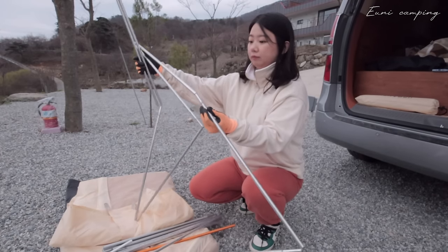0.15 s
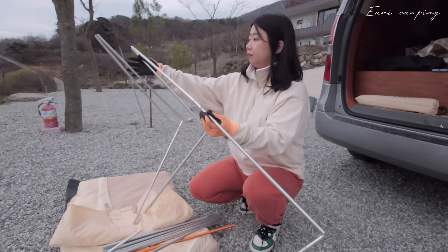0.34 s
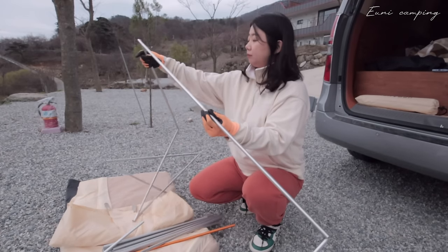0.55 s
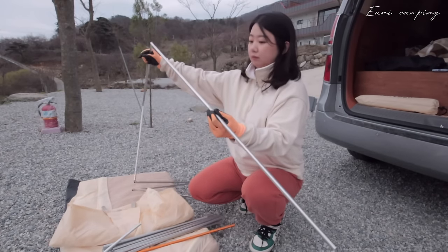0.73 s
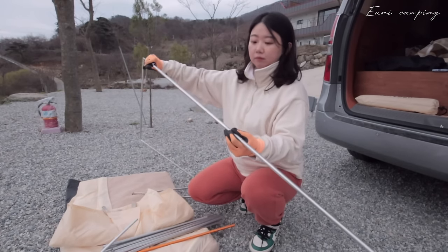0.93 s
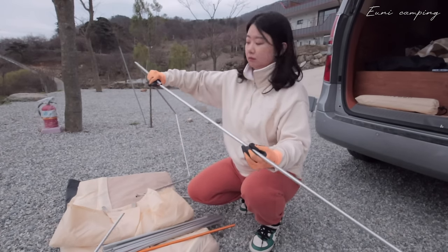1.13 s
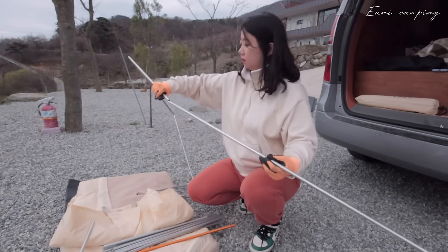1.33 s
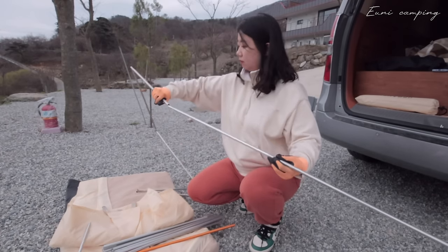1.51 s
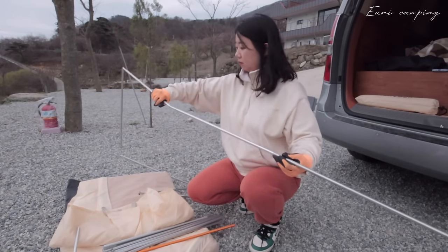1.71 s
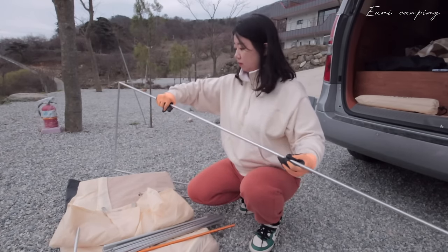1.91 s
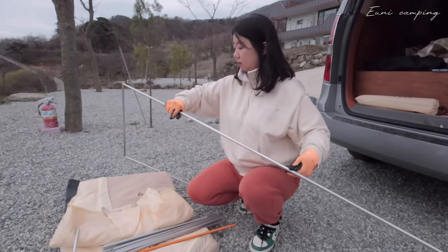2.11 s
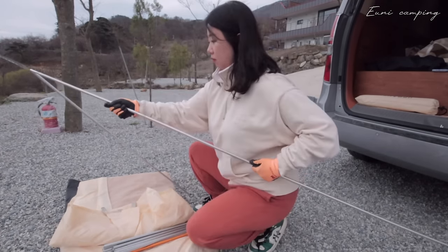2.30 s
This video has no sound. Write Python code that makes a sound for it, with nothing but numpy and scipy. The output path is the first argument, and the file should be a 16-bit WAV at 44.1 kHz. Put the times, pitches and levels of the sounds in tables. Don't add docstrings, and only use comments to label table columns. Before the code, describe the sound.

Metal tent pole tubes clink quickly and slide against each other, hit hardest in the first second, then fade to light ticks and a few crisp joining snaps, outdoors, close up, over faint air hiss.

```python
import sys
import numpy as np
from scipy import signal
from scipy.fft import rfft, irfft
from scipy.io import wavfile

SR = 44100
rng = np.random.default_rng(int(sys.argv[2]) if len(sys.argv) > 2 else 0)


def decibels_to_gain(level_db):
    exponent = np.asarray(level_db, float) / 20
    return 10 ** exponent


def persist_wave(psi):
    counts = np.round(np.clip(psi, -1, 1) * 32767).astype(np.int16)
    wavfile.write(sys.argv[1], SR, np.atleast_2d(counts).T)


N = 103635

# (pitch [Hz], level per Hz [dB])
AIR_COLOUR = [(15, -36), (25, -6), (229, -3), (451, -7.5), (714, -8.5), (935, -5.5), (1690, -9),
              (2680, -8.5), (16000, -22.5)]
# (pitch [Hz], likeness [0 to 1])
AIR_LIKENESS = [(60, 0.99), (240, 0.43), (950, 0.67), (3770, 0.42), (15000, 0.1)]
# (time [s], left over right [dB])
POLE_PLACE = [(0, 2.5), (.45, 1), (1.1, 4.5), (1.75, 0.6), (1.95, 3.5), (2.2, -4.5), (2.35, 0)]
# (pitch [Hz], level [dB])
METAL_COLOUR = [(150, 10.5), (800, 4), (2000, 2), (4000, -1), (7500, 1.5), (9500, -1), (12000, -4),
                (16000, -10)]
# (pitch [Hz], level [dB], halved in use, ring length [s] -
TUBE_TONES = [(1184, -6, 0.35), (2240, -7, 0.078), (3930, -1, 0.13), (5540, -18, 0.24), (5500, -31, 0.13),
              (5670, -1, 0.083), (6120, -14, 0.08), (7550, -2, 0.1), (8100, -26, 0.052)]
# (start [s], length [s], level [dB], from [Hz], to [Hz])
WHISTLES = [
    (0.07, 0.035, -52, 1480, 1180),
    (0.115, 0.055, -62, 1630, 1800),
    (0.918, 0.078, -54.5, 5450, 5830),
    (1.007, 0.075, -44, 5480, 5900),
    (1.009, 0.076, -50, 8040, 9900),
    (1.075, 0.08, -61, 7200, 7400),
    (1.452, 0.096, -67, 5540, 5500),
    (2.198, 0.062, -54.5, 4360, 4250),
    (2.199, 0.046, -57.5, 6840, 6780),
    (2.287, 0.028, -53, 3930, 3930),
]
# (time [s], level [dB])
DRAG = [(0, -61), (.05, -52), (.085, -39.5), (.12, -46.5), (.2, -43.5), (.3, -44.5), (.37, -35.5),
        (.385, -39.5), (.44, -41.5), (.53, -51), (.59, -55), (.76, -48.5), (.82, -44), (.9, -43.5),
        (.99, -55), (1.07, -51), (1.11, -51.5), (1.22, -69)]
# (start [s], length [s], level [dB], brightest [octaves over 1 kHz])
SLIDES = [(0.436, 0.029, -35, 1.9), (.603, 0.023, -44, -0.2), (0.665, 0.02, -29, 2.0),
          (0.469, .05, -41, 2.4), (0.644, 0.024, -48, 0), (1.27, 0.051, -62, 2.5),
          (1.461, 0.018, -65.5, 0.1), (1.489, .04, -51, 5), (1.573, 0.051, -58, 2.5),
          (1.644, 0.062, -60, 3), (1.715, .01, -36, 1.8), (1.727, 0.048, -54.5, 2), (1.87, 0.034, -48.5, 2),
          (1.898, 0.021, -51.5, 1.74), (1.962, 0.022, -50, 2.0), (1.981, 0.045, -52.5, 1.04),
          (2.209, .06, -51, 2), (2.281, 0.027, -48, 1.5), (2.307, 0.056, -57.5, 1.5),
          (0.221, .15, -74, -2.7), (.07, 0.048, -61, 0)]
# (time [s], peak level [dB], brightest [octaves over 1
# kHz], time to fall 60 dB [s])
KNOCKS = [
    (.6135, -23, -0.06, 0.017),
    (.667, -19, -0.6, 0.04),
    (.683, -21, -0.17, 0.057),
    (.697, -19, .7, 0.06),
    (.452, -35, -0.5, 0.04),
    (1.99, -35, -0.14, 0.075),
    (1.211, -49.5, 1.03, 0.016),
    (1.287, -47, 0.44, .03),
    (2.2845, -18, 1.28, 0.041),
    (.777, -44, -.3, 0.04),
          (.6125, -36, -2, .05), (.6675, -26, -2.4, .08), (.672, -22, .1, .05), (.345, -53, -2.6, .08),
         (.444, -32, .4, .07), (1.755, -60, -2.4, .1), (1.99, -36, .26, .06), (.4995, -22, .55, .07),
         (.458, -32, -.6, .05), (.70, -33, -2.4, .08), (2.286, -33, -.2, .05), (1.724, -44, -.3, .07)]
# (time [s],
# peak level [dB], brightest [octaves over 1 kHz], time to fall 60 dB [s])
TOUCHES = [(.0905, -24.5, 2.7, 0.072), (.2122, -19, 2.42, 0.021), (.2178, -27, 2.56, .04),
           (.231, -20, 1.78, 0.08), (.270, -20, 2.26, 0.028), (.2765, -21.5, 2.67, 0.041),
           (.2845, -15.5, 2.4, .012), (.318, -23.5, 1.96, 0.049), (.3425, -18.5, 1.68, 0.12),
           (.348, -14, 2.6, 0.034), (.390, -18, 2.21, .04), (.4252, -14, 2.9, 0.015), (.456, -22, 1.2, 0.02),
           (.4838, -13, 2.7, 0.027), (.4986, 1, 2.5, 0.0098), (.676, -11.5, 0.76, .03),
           (.6962, -1, 2.0, 0.05), (.7742, -17, 3.1, 0.068), (.7765, -8, 1.75, 0.066), (.812, -28, 3.3, .05),
           (.834, -23, 2.9, 0.055), (.870, -21.5, 2.9, 0.078), (.8865, -17.5, 2.64, 0.086),
           (.928, -29.5, 3.2, 0.015), (1.016, -27, 2.4, 0.054), (1.0565, -22, 2.42, 0.13),
           (1.080, -28.5, 2.1, 0.058), (1.117, -36, 2.5, 0.055), (1.137, -32.5, 2.82, 0.098),
           (1.17, -44, 4, .03),
    (1.215, -45.5, 2.24, .03),
    (1.3205, -47, 1.37, 0.021),
    (1.4442, -14.5, 2.015, 0.067),
    (1.453, -17.5, 3.45, 0.064),
    (1.648, -32.5, 2.44, 0.072),
    (1.7225, -13.5, 1.68, 0.047),
    (1.9857, -5, 2.71, 0.023),
    (1.986, -11, 1.25, 0.06),
    (2.011, -27.5, 2.6, 0.081),
           (.0773, -33, 2.3, .04), (.352, -21.5, 1.8, .05), (.362, -24.5, 2.7, 0.045),
         (.4275, -11, 2.35, 0.025), (.4445, -25, 1.5, 0.034), (.4615, -27, .6, .03), (.479, -28, .6, .03),
         (.4853, -11, 2.4, .015), (.5001, -6, 2, 0.027), (.5018, -6, 2.1, .03), (.6135, -30, 1.5, .06),
         (.6668, -18.5, 2.15, 0.025), (.689, -25, 2.1, 0.022), (.6977, -3, 2.97, 0.046),
         (.826, -28, 2.9, 0.028), (.8955, -24, 2.6, 0.026), (.958, -37, 3, .03), (1.0045, -35, 2.5, 0.027),
         (1.035, -33.5, 2.6, .03), (1.478, -43, .4, 0.028), (1.61, -45, 1.6, .04), (1.672, -44, 1.2, .04),
         (1.884, -38.5, 2, 0.046), (2.213, -41, 1.8, 0.048)]

AIR_DB = -62
THUMP_AT_S, THUMP_HZ, THUMP_DB, THUMP_T60_S = .667, 126.2, -40, .1
WHISTLE_WIDTH_SHARE, WHISTLE_ROUGH, WHISTLE_LUMPS_DB = .1, 2.0, 3
DRAG_HZ, DRAG_OCTAVES = 5000, 0.98
GRAINS_PER_S, GRAIN_SPREAD_DB, DRAG_T60_SHARE, RASP_DB = 1300, 1.5, 0.19, -26
SLIDE_RISE_S, SLIDE_FALL_S, SLIDE_OCTAVES = 0.0096, .012, 1.0
LADDER_HZ, LADDER_DB = 330.9, 0
MODE_SPREAD_DB, RISE_S = 3.5, .00008
CHATTER_S, CHATTER_DB = .002, -4
CRACK_DB, CRACK_S, CRACK_FLATTER, TAIL_DB = 5, .0005, .6, -1.5
OWN_SHARE, ACCENT_DB, ACCENT_OCTAVES = 0.56, 7, .14
GROUND_DB, GROUND_T60_S = -11, 0.044
PAN_FROM_HZ, RIGHT_LAG_S = 1500, 4.2e-5
SWAY_DB, SWAY_PER_S = 2.5, 25


def rms_one(x):
    return x / np.sqrt(np.mean(x ** 2) + 1e-20)


def line(points, x, warp=np.asarray):
    return np.interp(warp(x), warp(np.array(points)[:, 0]), np.array(points)[:, 1])


def bell_db(hz, centre_hz, octaves):
    away = np.log2(np.maximum(hz, 20) / centre_hz) / octaves
    return -20 * np.log10(1 + away ** 2 * 2)


def colour(x, db_of_hz):
    size = x.shape[-1]
    hz = np.arange(size // 2 + 1) * SR / size + 1
    return irfft(rfft(x) * decibels_to_gain(db_of_hz(hz)), size)


def drift(rate):
    r = np.exp(-2 * np.pi * rate / SR)
    wander = signal.lfilter([1], [1, -2 * r, r * r], rng.standard_normal(N + SR))
    return rms_one(wander[SR:])


def air():
    def alike(f):
        return np.clip(line(AIR_LIKENESS, f, np.log), 0, .98)
    mid, side = rng.standard_normal((2, N))
    mid = colour(mid, lambda f: line(AIR_COLOUR, f, np.log) + 10 * np.log10(1 + alike(f)))
    side = colour(side, lambda f: line(AIR_COLOUR, f, np.log) + 10 * np.log10(1 - alike(f)))
    return decibels_to_gain(AIR_DB + 1.0 * drift(1)) * rms_one(np.array([mid + side, mid - side]))


def ground_scatter(pole):
    t = np.arange(SR // 8) / SR
    scatter = rng.standard_normal((2, len(t))) * decibels_to_gain(-60 * t / GROUND_T60_S) * (t > .0005)
    scatter = scatter / np.sqrt(np.sum(scatter[0] ** 2))
    return decibels_to_gain(GROUND_DB) * signal.fftconvolve(pole[None], scatter, axes=1)[:, :N]


def thump():
    t = np.maximum(np.arange(N) / SR - THUMP_AT_S, 0)
    return decibels_to_gain(THUMP_DB - 60 * t / THUMP_T60_S) * np.sin(2 * np.pi * THUMP_HZ * t)


def whistles():
    out, chance = np.zeros(N), WHISTLE_ROUGH * rng.standard_normal((2, N))
    for start, length, db, from_hz, to_hz in WHISTLES:
        x = np.clip((np.arange(N) / SR - start) / length, 0, 1)
        cycles = np.cumsum(from_hz + (to_hz - from_hz) * x) / SR
        rough, wobble = (np.interp(cycles * WHISTLE_WIDTH_SHARE * 2, np.arange(N), c) for c in chance)
        tone = (1 + rough) * np.cos(2 * np.pi * cycles) + wobble * np.sin(2 * np.pi * cycles)
        out += decibels_to_gain(db) * np.sin(np.pi * x) * tone
    return out * decibels_to_gain(WHISTLE_LUMPS_DB * drift(82))


def tube_modes(count=48):
    hz, db, t60 = np.transpose(TUBE_TONES)
    ladder = LADDER_HZ * (np.arange(count) + .5 + rng.uniform(-0.38, 0.31, count))
    share = np.r_[np.clip(t60 / np.median(t60), .5, 1), rng.uniform(.6, 1.1, count)]
    return np.r_[hz, ladder], np.r_[db / 2, np.full(count, LADDER_DB)], share


def rasp(modes):
    sizes = decibels_to_gain(GRAIN_SPREAD_DB * np.minimum(rng.exponential(1, N), 5)) * rng.choice([-1, 1], N)
    slips = rng.random(N) < GRAINS_PER_S * decibels_to_gain(5 * drift(40)) / SR
    grains = sizes * slips + 0.19 * rng.standard_normal(N)
    dealt, rung = rng.integers(0, 4, N), 0
    for k, (hz, db, share) in enumerate(zip(*modes)):
        r, w = decibels_to_gain(-60 / (share * DRAG_T60_SHARE * 0.051 * SR)), 2 * np.pi * hz / SR
        resonance = [0, np.sin(w)], [1, -2 * r * np.cos(w), r * r]
        rung = rung + decibels_to_gain(db) * signal.lfilter(*resonance, grains * (dealt == k % 4))
    smear = signal.fftconvolve(grains, rng.standard_normal(200) * np.exp(-np.arange(200) / 50))[:N]
    return rms_one(rung) + decibels_to_gain(RASP_DB) * rms_one(smear)


def gate(start, length):
    t = np.arange(N) / SR - start
    return np.clip(t / SLIDE_RISE_S, 0, 1) * np.exp(-np.clip(t - length, 0, 1) / SLIDE_FALL_S)


def slides(texture):
    t = np.arange(N) / SR
    drag = rms_one(colour(texture, lambda f: 2 * bell_db(f, DRAG_HZ, DRAG_OCTAVES * 2)))
    out = decibels_to_gain(line(DRAG, t)) * (t < DRAG[-1][0]) * drag
    for start, length, db, bright in SLIDES:
        a, b = int(start * SR), min(int((start + length + 0.08) * SR), N)
        part = colour(texture[a:b], lambda f: 1.034 * bell_db(f, 1e3 * 2 ** bright, SLIDE_OCTAVES))
        out[a:b] += decibels_to_gain(db) * rms_one(part) * gate(start, length)[a:b]
    return out


def hits(rows, modes, octaves, usual, cut_octaves):
    hz, db, share = modes
    out, t = np.zeros(N + SR), np.arange(SR // 8) / SR
    for s, peak_db, bright, t60 in rows:
        centre_hz = 1000 * 2 ** (usual + OWN_SHARE * (bright - usual))

        def tone_db(f):
            accent = np.exp(-((np.log2(f / 1e3) - bright) / ACCENT_OCTAVES) ** 2)
            return bell_db(f, centre_hz, octaves) + ACCENT_DB * accent

        gains = decibels_to_gain(db + tone_db(hz) + MODE_SPREAD_DB * rng.standard_normal(len(hz)))
        phases = rng.uniform(0, 2 * np.pi, (len(hz), 1))
        heard, ringing = t[:int(t60 * SR)], np.zeros(len(t))
        fades = decibels_to_gain(-60 * np.outer(1 / (share * t60), heard))
        ringing[:len(heard)] = gains @ (np.sin(2 * np.pi * np.outer(hz, heard) + phases) * fades)
        noise = rms_one(colour(rng.standard_normal(len(t)), tone_db))
        tail = noise * decibels_to_gain(TAIL_DB - 60 * t / t60)
        crack = rms_one(colour(noise, lambda f: -CRACK_FLATTER * tone_db(f)))
        crack = decibels_to_gain(CRACK_DB) * np.exp(-t / CRACK_S) * crack
        body = ringing / np.sqrt(np.sum(gains ** 2) / 2) + tail + crack
        body = body * (1 - np.exp(-t / RISE_S))
        touches, waits = np.zeros(SR // 40), np.minimum(rng.exponential(1, 5), 5)
        bounces = decibels_to_gain(CHATTER_DB) * np.exp(-waits / 2) * rng.uniform(-1.35, 1, 5)
        touches[(waits * CHATTER_S * SR).astype(int)] = bounces
        touches[0] = 1
        hit = signal.fftconvolve(body, touches)[:len(t)]
        low_cut = signal.butter(3, centre_hz / 2 ** cut_octaves, "high", fs=SR, output="sos")
        hit = signal.sosfilt(low_cut, hit)
        out[int(s * SR):int(s * SR) + len(hit)] += decibels_to_gain(peak_db) * hit / np.abs(hit).max()
    return out[:N]


def soft_knocks(modes):
    return hits(KNOCKS, modes, octaves=.9, usual=-0.28, cut_octaves=1.8)


def metal_touches(modes):
    return hits(TOUCHES, modes, octaves=1.0, usual=2.36, cut_octaves=1.1)


def metal_colour(pole):
    hz, db = np.transpose(METAL_COLOUR)
    taps = signal.firwin2(257, np.r_[0, hz, SR / 2], decibels_to_gain(np.r_[-20, db, -30]), fs=SR)
    return signal.fftconvolve(pole, taps)[128:N + 128]


def two_ears(pole):
    pan_db = line(POLE_PLACE, np.arange(N) / SR) / 2 + SWAY_DB * drift(SWAY_PER_S) / 2
    hz = np.arange(N // 2 + 1) * SR / N
    late = irfft(rfft(pole) * np.exp(-2j * np.pi * hz * RIGHT_LAG_S), N)
    pair = np.array([pole, late])
    lows = signal.lfilter(*signal.butter(1, PAN_FROM_HZ, fs=SR), pair)
    return lows + (pair - lows) * decibels_to_gain([pan_db, -pan_db])


def scene():
    modes = tube_modes()
    background = air()
    pole = thump() + whistles() + slides(rasp(modes)) + soft_knocks(modes) + metal_touches(modes)
    pole = metal_colour(pole)
    return background + ground_scatter(pole) + two_ears(pole)


def low_pass(x):
    return signal.sosfilt(signal.butter(12, 16120, fs=SR, output="sos"), x)


def record(dry):
    top_cut = signal.cheby2(20, 50, 16150, fs=SR, output="sos")
    mix = np.clip(signal.sosfilt(top_cut, dry), -1, 1)
    return low_pass(mix)


dry = scene()
out = record(dry)
persist_wave(out)
```